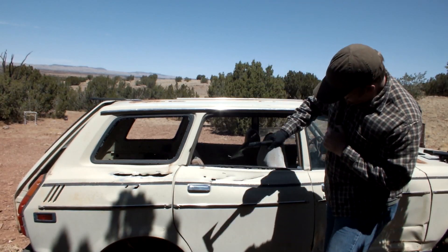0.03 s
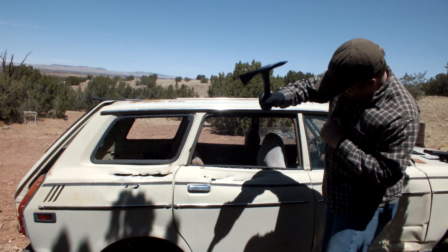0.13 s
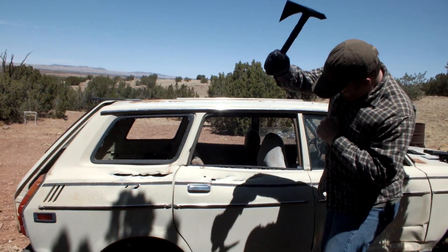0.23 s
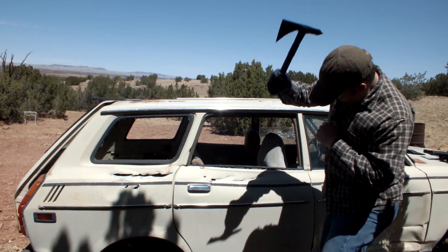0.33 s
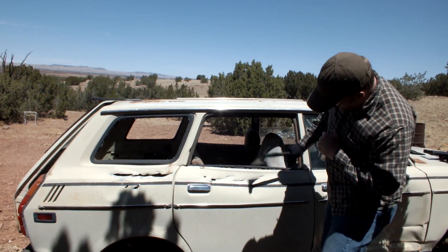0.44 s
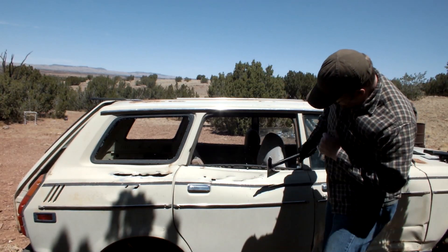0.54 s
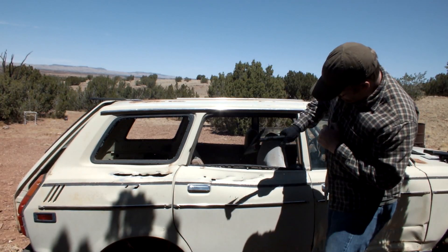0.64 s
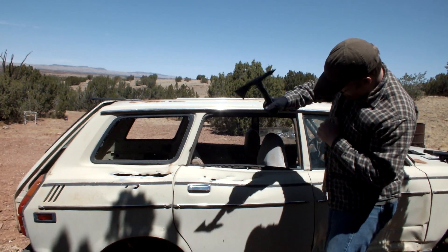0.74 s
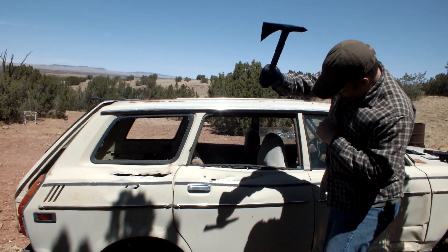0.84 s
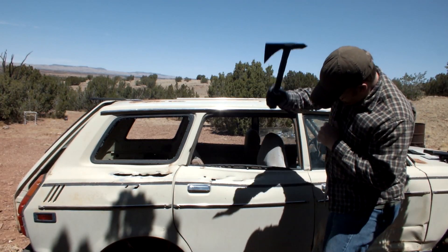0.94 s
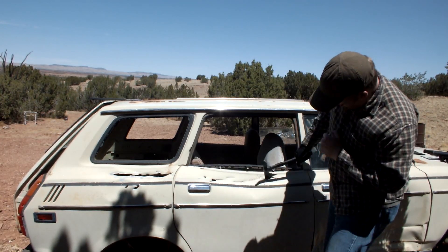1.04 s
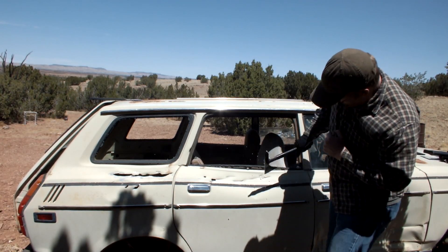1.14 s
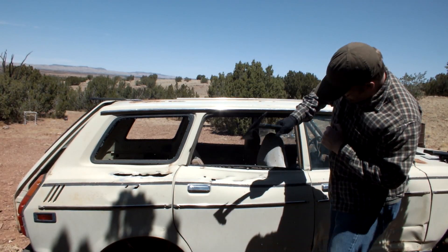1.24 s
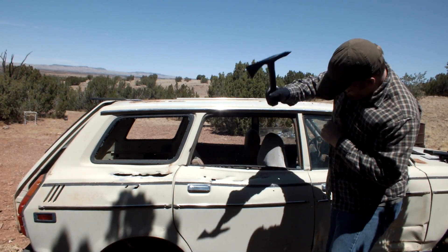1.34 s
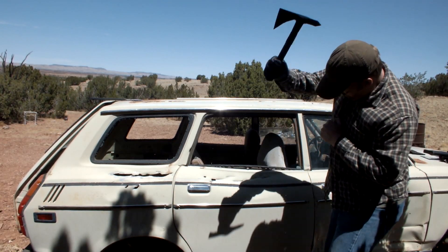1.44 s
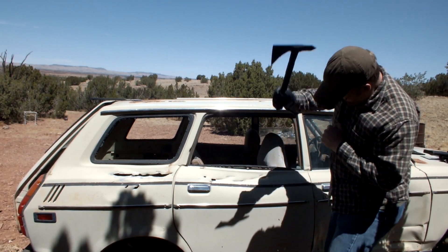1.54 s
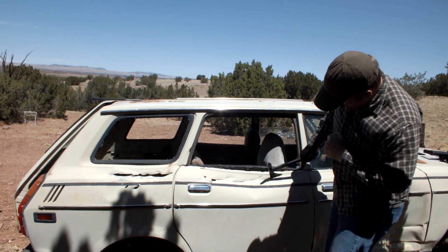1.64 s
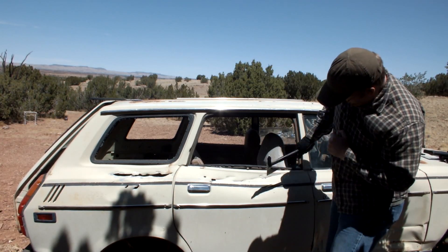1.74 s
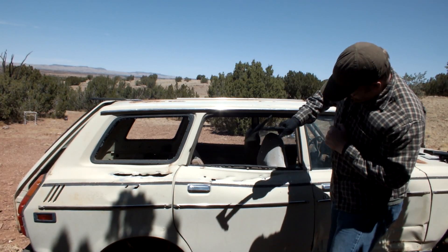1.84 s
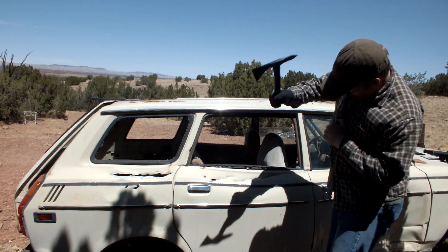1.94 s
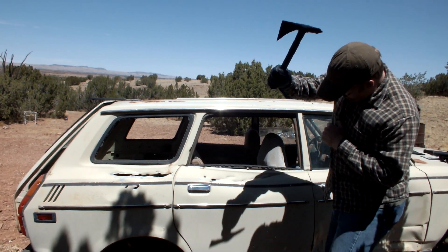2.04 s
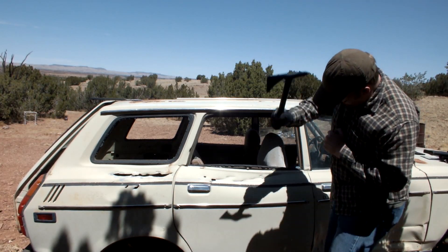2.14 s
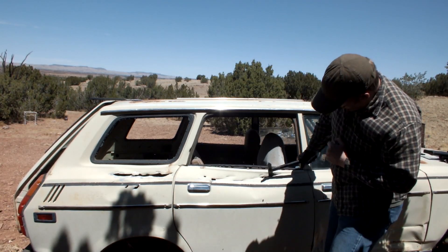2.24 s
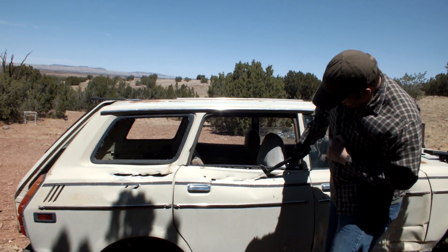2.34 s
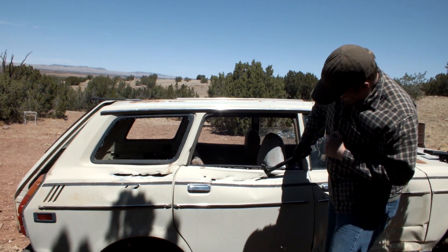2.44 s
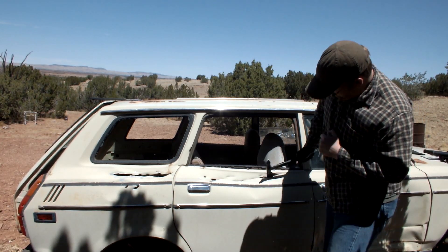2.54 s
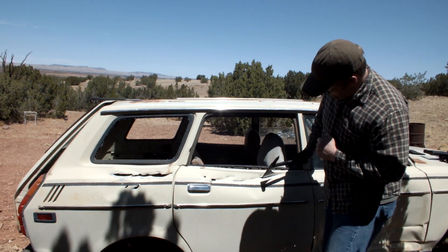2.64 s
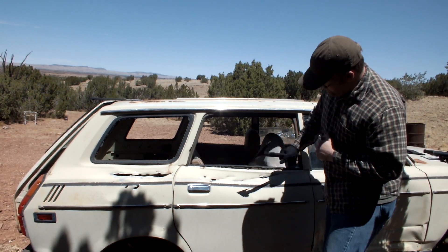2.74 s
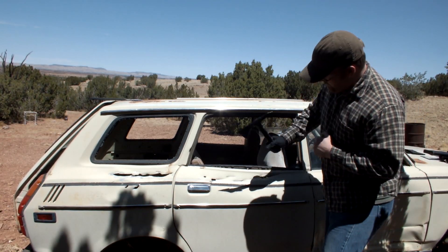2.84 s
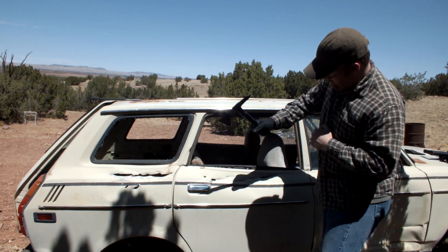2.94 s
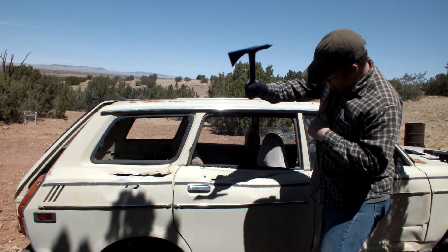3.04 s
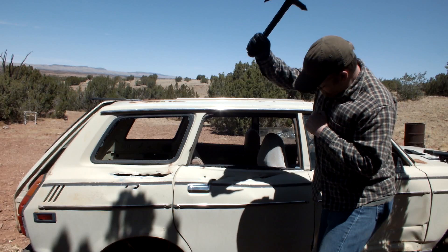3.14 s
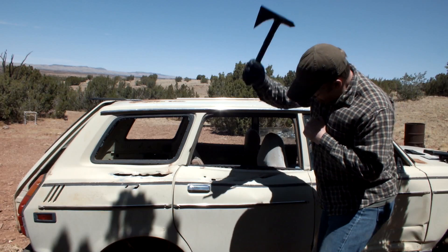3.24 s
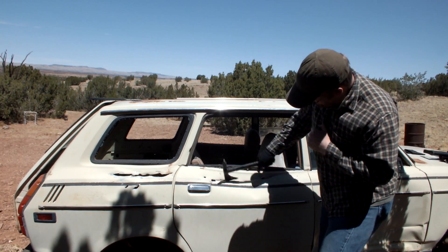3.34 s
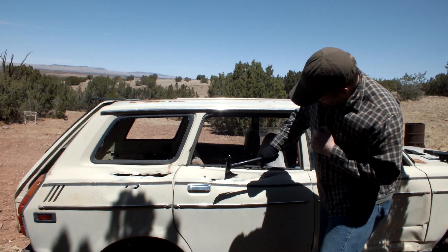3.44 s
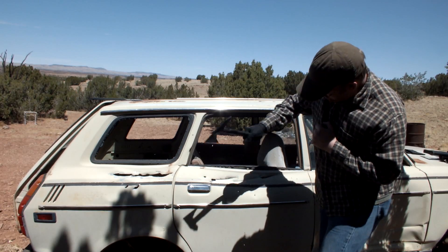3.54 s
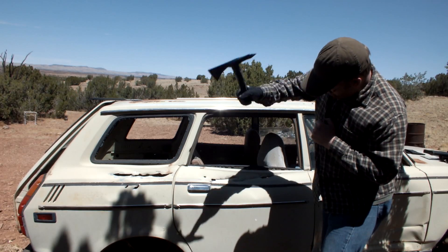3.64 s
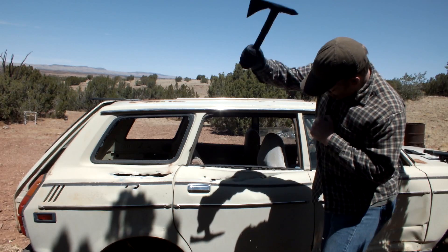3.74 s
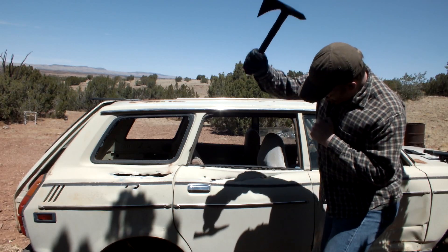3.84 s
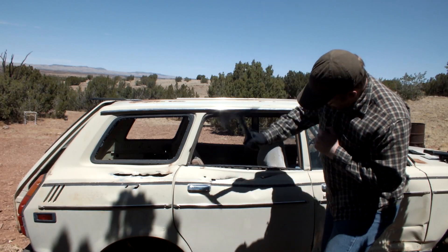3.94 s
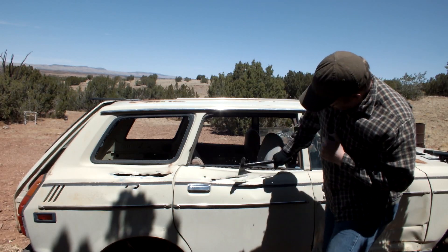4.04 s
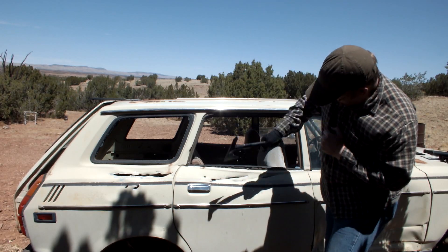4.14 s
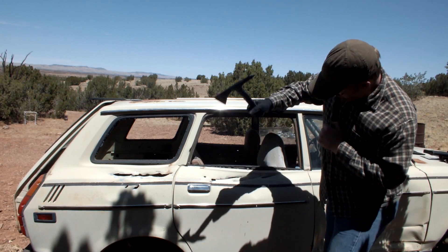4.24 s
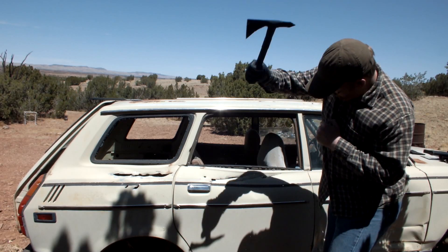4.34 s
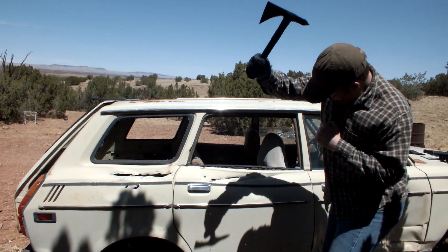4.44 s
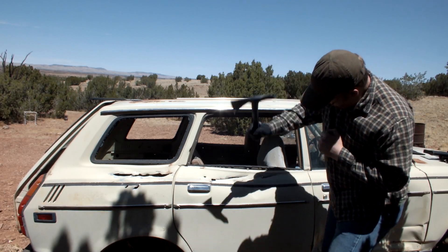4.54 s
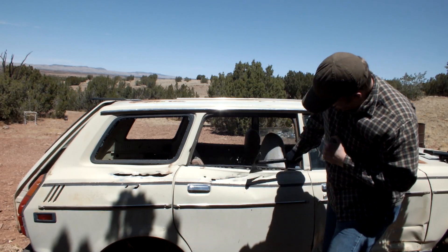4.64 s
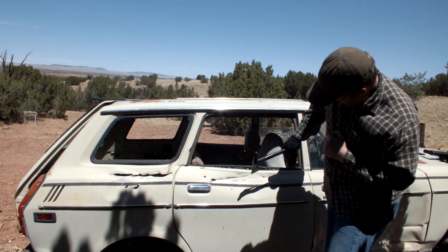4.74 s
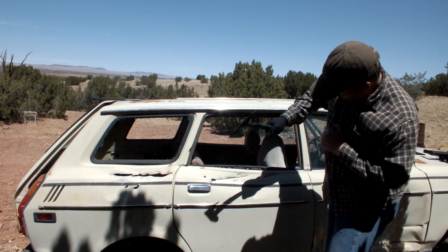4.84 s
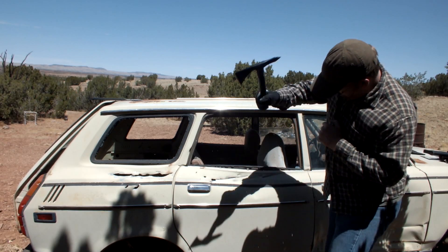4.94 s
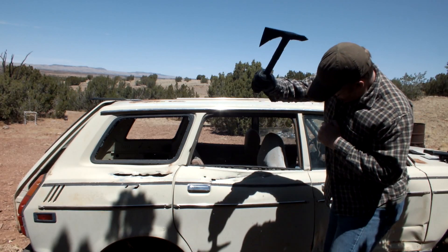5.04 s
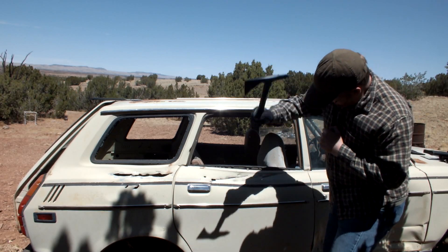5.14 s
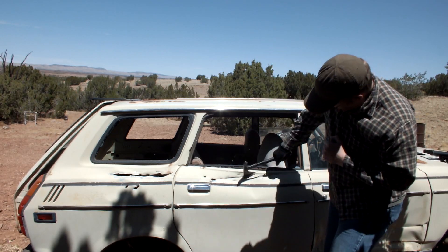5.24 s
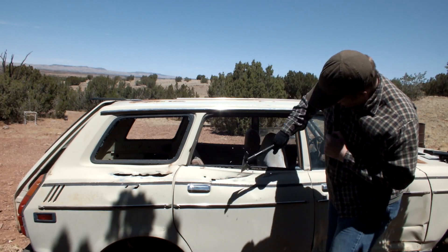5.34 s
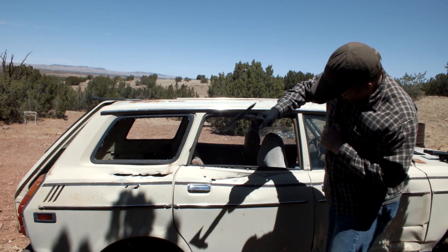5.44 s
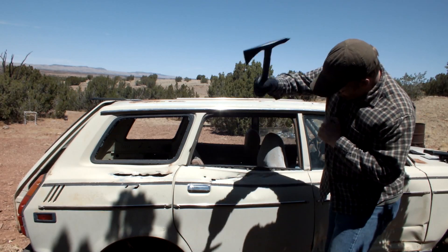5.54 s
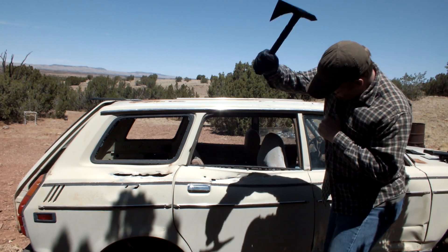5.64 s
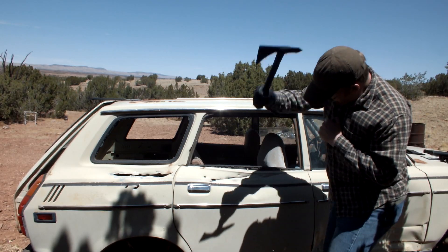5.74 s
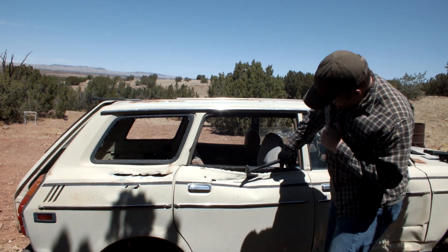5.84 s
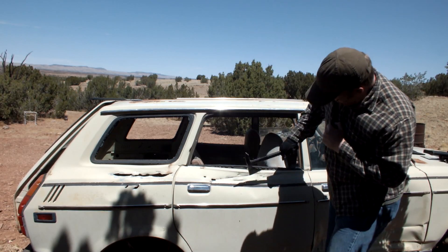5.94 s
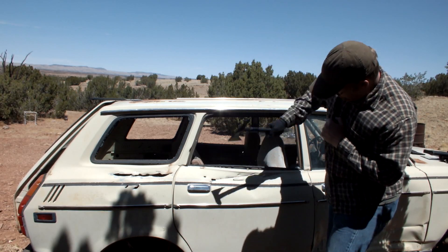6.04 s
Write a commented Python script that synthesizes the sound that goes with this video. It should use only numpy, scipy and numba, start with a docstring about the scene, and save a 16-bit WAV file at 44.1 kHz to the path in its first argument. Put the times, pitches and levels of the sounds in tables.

```python
"""Open desert, a derelict car: a hand axe chops the last glass out of a side window, ten blows.
Each blow cracks the glass (filtered noise and clicks), booms the hollow steel door (decaying modes and
noise bands) and rattles the crumbs inside it (clicks ringing glass modes). Between blows the blade
crunches out of the channel and chips, splinters and crumbs fall; a few single tones ring, over faint air.
A limiter flattens the booms."""
import sys
import numpy as np
from scipy import signal
from scipy.fft import rfft, irfft, next_fast_len
from scipy.io import wavfile
from numba import njit

SR = 44100
rng = np.random.default_rng(int(sys.argv[2]) if len(sys.argv) > 2 else 0)


def master_out(mix):
    """Clip the mix to full scale and print it as 16-bit PCM to the path in sys.argv[1]."""
    frames = np.transpose(np.atleast_2d(mix))
    ceiling = np.clip(frames, -1, 1)
    pcm = np.round(ceiling * 32767).astype(np.int16)
    wavfile.write(sys.argv[1], SR, pcm)


N = 268127


def undb(db):
    """Decibels to gain."""
    return 10 ** (np.asarray(db) / 20)


def at(points, hz):
    """Interpolate (Hz, value) points on a log-frequency axis."""
    point_hz, value = np.transpose(points)
    return np.interp(np.log(np.maximum(hz, 1)), np.log(point_hz), value)


def noise(count):
    """Two independent noises: row 0 is common to both channels (mid), row 1 their difference (side)."""
    return rng.standard_normal((2, count))


def colour(x, points, extra=None):
    """Minimum-phase filter: unit power for white input, then tilted by extra (Hz, dB) points."""
    count = x.shape[-1]
    size = 2 * next_fast_len(count)
    hz = np.arange(size // 2 + 1) * SR / size
    gain = undb(at(points, hz))
    gain = gain / np.sqrt(np.mean(gain ** 2))
    if extra is not None:
        gain = gain * undb(at(extra, hz))
    # folding the cepstrum onto positive time makes the response causal
    cepstrum = irfft(np.log(gain))[:size // 2]
    response = np.exp(rfft(2 * cepstrum, size) - cepstrum[0])
    return irfft(rfft(x, size) * response)[..., :count]


def fade(t, t60):
    """Exponential decay, 60 dB down after t60 seconds."""
    return np.exp(-np.log(1000) * t / np.maximum(t60, 1e-4))


def clicks(count, rate_hz, spread_db):
    """Random clicks of very unequal size, unit power."""
    hit = rng.random(count) < rate_hz / SR
    size = hit * undb(spread_db * np.clip(rng.standard_normal(count), -2, 2))
    return noise(count) * size / np.sqrt(np.mean(size ** 2) + 1e-12)


def cabin(x, wet_db, t60):
    """Direct sound plus diffuse echoes of door and cabin: fresh noise following the decaying energy."""
    keep = fade(1 / SR, t60) ** 2
    energy = signal.lfilter([1 - keep], [1, -keep], x[0] ** 2 + 1e-18)
    return x + undb(wet_db) * noise(x.shape[1]) * np.sqrt(energy)


def add(out, start_s, x):
    """Mix x into out from start_s."""
    start = int(round(start_s * SR))
    a, b = max(start, 0), min(start + x.shape[1], N)
    if a < b:
        out[:, a:b] += x[:, a - start:b - start]


def modes(table, t, ring, build_cycles, scatter_db=-3.0, detune=0.0083):
    """Modes build up over some cycles and ring out; every blow lands elsewhere and weights them anew."""
    out = np.zeros((2, len(t)))
    draws = rng.standard_normal((len(table), 3))
    for (pitch_hz, level_db, t60), (shift, phase, weight) in zip(table, draws):
        wave = np.sin(2 * np.pi * (pitch_hz * (1 + detune * shift) * t + phase))
        build = 1 - np.exp(-t * pitch_hz / build_cycles)
        out[0] += undb(level_db + scatter_db * weight) * wave * fade(t, ring * t60) * build
    return out


def shard(x, t60, count=48, size=2400):
    """Ring of a piece of glass: its odd shape gives it scattered modes of its own."""
    t = np.arange(size) / SR
    place, phase, strength = rng.random((count, 3)).T[:, :, None]
    hz = 900 + 14000 * place ** 1.2
    ring = np.sum(strength * np.sin(2 * np.pi * (hz * t + phase)), axis=0) * fade(t, t60)
    unit_ring = ring[None] / np.sqrt(np.sum(ring ** 2))
    return signal.fftconvolve(x, unit_ring, axes=1)[:, :x.shape[1]]


# air spectrum: [pitch_hz, density_rel_db]
AIR_SPECTRUM = [(30, -10), (100, 9.5), (400, 6.5), (1100, -3), (1600, -12), (2150, 0), (3200, -37),
                (6500, -14), (13000, -21), (15000, -37)]


def air(level_db=-59):
    """Faint steady hiss of open country: filtered noise."""
    return undb(level_db) * colour(noise(N), AIR_SPECTRUM)


# blade drawn back, grinding along the glass in the channel: [start_s, length_s, peak_rel_db]
BLADE_DRAGS = [(0.287, 0.047, -41.5), (1.526, 0.025, -30), (1.605, 0.037, -33), (1.975, 0.13, -43),
               (2.69, .08, -49), (4.38, 0.2, -42.5), (4.901, 0.056, -38)]


def crumb_flow(fall_s=0.016, shed_db=-35, shed_t60=0.49, settle_db=-60, count=2000):
    """Crumb amplitude: each blow spills some, each chip sheds a few, the dragged blade grinds out more."""
    t = np.linspace(0, N / SR, count)
    power = np.full(count, undb(settle_db) ** 2)
    for start_s, *_, spill_db, spill_s in BLOWS_AND_BUMPS:
        age = np.maximum(t - start_s, 0)
        spill = undb(spill_db) * (1 - np.exp(-age / fall_s)) * np.exp(-(age / spill_s) ** 2)
        power += spill ** 2
    for start_s, level_db, *_ in GLASS_CHIPS:
        shed = undb(level_db + shed_db) * fade(abs(t - start_s), shed_t60)
        power += (t > start_s) * shed ** 2
    for start_s, length_s, level_db in BLADE_DRAGS:
        progress = np.clip((t - start_s) / length_s, 0, 1)
        power += undb(level_db) ** 2 * abs(np.sin(np.pi * progress))
    return np.interp(np.arange(N) / SR, t, np.sqrt(power))


# falling crumb spectrum: [pitch_hz, density_rel_db]
CRUMB_SPECTRUM = [(50, -84), (200, 0), (600, 1), (1500, 4.5), (3500, 3), (5200, -5), (7500, -9),
                  (10000, -15.5), (15000, -25.5)]


def trickle(level_db=-3, glass_db=-7, size=2205):
    """Fine crumbs skitter down door and seat: clicks ring a new set of glass modes every 50 ms."""
    crumbs = clicks(N, 900, 4.36) * crumb_flow() * undb(level_db)
    out = cabin(crumbs, 0, 0.04)
    for start in range(0, N, size):
        handful = np.pad(crumbs[:, start:start + size], [(0, 0), (0, size)])
        add(out, start / SR, undb(glass_db) * shard(handful, 0.06, count=24))
    return colour(out, CRUMB_SPECTRUM)


def splinters(level_db=-32, spread_db=-2.5, treble_db=-14, earliest_s=0.11, latest_s=0.75,
              count=4, size=3000):
    """Splinters thrown up by each blow tick down at random moments, louder after a harder crack."""
    out, t = np.zeros((2, N)), np.arange(size) / SR
    tone = [(4300, 0), (7500, treble_db)]
    for start_s, _, crack_db, *_ in BLOWS_AND_BUMPS:
        flights_s = rng.uniform(earliest_s, latest_s, count)
        offsets_db = spread_db * rng.standard_normal(count)
        for flight_s, offset_db in zip(flights_s, offsets_db):
            tick = noise(size) * fade(t, 0.006)
            sound = cabin(tick, 0, 0.017) + shard(tick, 0.023, count=16)
            gain = undb(level_db + crack_db + offset_db)
            add(out, start_s + flight_s, gain * colour(sound, CHIP_SPECTRUM, tone))
    return out


# brief single tones: [start_s, pitch_hz, level_db, t60_s]
SINGLE_TONES = [(0.238, 6800, -42, 0.049), (0.272, 14850, -42, .08), (0.541, 7585, -39, 0.42),
                (0.714, 3370, -15, 0.029), (1.43, 2320, -29, 0.066), (1.430, 2030, -26.5, 0.045),
                (1.429, 2690, -29, 0.034), (2.025, 3400, -26, .05), (2.537, 6900, -41.5, 0.13),
                (2.588, 410, -18.5, .13), (2.620, 14900, -42, 0.058), (2.696, 7000, -39, 0.12),
                (2.715, 3310, -27, 0.047), (2.743, 2905, -28, 0.12), (2.746, 1880, -29, 0.087),
                (5.310, 7640, -60, 0.83), (5.931, 7620, -30, 0.28)]


def pings(size=20000):
    """A door panel, the blade or a loose shard rings on a single mode: a decaying sine."""
    out, t = np.zeros((2, N)), np.arange(size) / SR
    for start_s, pitch_hz, level_db, t60 in SINGLE_TONES:
        wave = np.sin(2 * np.pi * (pitch_hz * t + rng.random((2, 1))))
        add(out, start_s, undb(level_db) * fade(t, t60) * wave)
    return out


# chip spectrum: [pitch_hz, density_rel_db]
CHIP_SPECTRUM = [(60, -11), (250, -0.5), (500, 7.5), (900, 4), (1600, 6), (2400, 5), (3700, 3.5),
                 (5000, 1.5), (7500, 12), (9500, 4.5), (15000, -3.5)]
# larger pieces snapping in the channel or landing on the door:
# [start_s, level_rel_db, treble_db, crunch_decay_s]
GLASS_CHIPS = [(0.049, -15, -21, 0.011), (0.256, -22, -14.5, 0.013), (0.314, -25, -8.5, 0.0096),
               (0.398, -31, -16, 0.011), (0.532, 1.5, -37, 0.0041), (0.7175, -6, -27.5, 0.0092),
               (0.83, -10, -18, 0.0077), (0.964, -6, -21.5, .017), (1.07, -11, -16.5, 0.012),
               (1.281, -19, -48, 0.0067), (1.431, -28.5, -42, .01), (1.537, -14, -24.5, 0.031),
               (1.596, -20, -10, 0.0087), (1.613, -10, -24.5, 0.013), (1.638, -15.5, -28.5, 0.027),
               (1.886, -11, -9, 0.0061), (1.943, -12.5, -19.5, 0.0033), (2.081, -16.5, -7, 0.0039),
               (2.124, -13.5, -20, .008), (2.166, -27.5, -6, 0.0058), (2.181, -20.5, -13.5, 0.0087),
               (2.235, -10.5, -18.5, .008), (2.437, -21.5, -29, 0.007), (2.47, -20.5, -30, 0.0086),
               (2.591, -17.5, -73.5, 0.016), (2.657, -20.5, -13, 0.0047), (2.717, -16.5, -8, 0.0078),
               (2.744, -15, -12, 0.0097), (2.968, -20, -9, .006), (3.015, -22.5, -15.5, 0.0074),
               (3.29, -32, -38, 0.007), (3.653, -16.5, -18, 0.073), (3.721, -10, -14.5, 0.017),
               (3.7818, -9.5, -12, 0.016), (3.835, -13, -13.5, 0.0087), (3.868, -18, -15, 0.013),
               (3.894, -15.5, -13, 0.028), (3.921, -25, -1.5, 0.0066), (3.952, -22, -20, 0.011),
               (4.011, -24, -7, .006), (4.171, -14, -36, 0.0068), (4.268, -20.5, -26, .007),
               (4.302, -19.5, -14.5, 0.019), (4.36, -24, -7.5, 0.0094), (4.416, -29, -4.5, 0.034),
               (4.488, -14, -13, 0.011), (4.518, -25.5, -11, 0.0052), (4.618, -17, -13.5, 0.015),
               (4.946, -8, -18.5, 0.011), (4.955, -14, -47, 0.022), (5.078, -29.5, -22, 0.016),
               (5.129, -23.5, -19, 0.017), (5.155, -7.5, -21, 0.011), (5.415, -9, -47, 0.0041),
               (5.477, -18.5, -23, 0.0044), (5.652, -26, -13, 0.013), (5.696, -21, -22, 0.022),
               (5.803, -30.5, -19.5, 0.039)]


def chips(level_db=-1, click_db=12, snap_t60=0.0036, crunch_db=-9, glass_db=-6,
          knock_db=-15, knock_slope=0.37, size=6000):
    """A snap and a run of small fractures ring the shard and echo in the door; dull pieces knock more."""
    out, t = np.zeros((2, N)), np.arange(size) / SR
    for start_s, chip_db, treble_db, crunch_s in GLASS_CHIPS:
        snap = noise(size) * fade(t, snap_t60)
        crunch = undb(crunch_db) * clicks(size, 1500, 8) * np.exp(-t / max(crunch_s, .001))
        fracture = snap + crunch
        fracture[0, 0] += undb(click_db)
        sound = cabin(fracture, 0, 0.06) + undb(glass_db) * shard(fracture, 0.06, count=28)
        tone = [(450, knock_db - knock_slope * treble_db), (1000, 0), (4300, 0), (7500, treble_db)]
        add(out, start_s, undb(chip_db + level_db) * colour(sound, CHIP_SPECTRUM, tone))
    return out


# door panels and cavity: [pitch_hz, level_rel_db, t60_s at ring 1]
PANEL_MODES = [(164.7, -6.5, 0.72), (196, -28, 0.26), (232.4, -1, 0.44), (267.2, -7.5, 0.73),
               (308.1, -0.5, 0.3), (340, -37, 1), (360, -1.5, 0.23), (411, -6.5, 0.56), (534, -21.5, 0.49),
               (750, -10.5, 0.7), (947, -2.5, 0.24)]
# dense higher door modes: [pitch_hz, density_rel_db]
DOOR_SPECTRUM = [(25, -31), (65, 9), (105, 1.5), (138, 0), (165, -0.5), (200, -1.5), (260, 4), (420, 4),
                 (560, -0.5), (780, -6.5), (1150, -23.5), (3000, -24), (5500, -36.5), (14000, -43.5)]
# their decay: [pitch_hz, t60_s at ring 1]
DOOR_DECAY = [(60, 0.87), (170, 0.75), (350, 0.5), (800, 0.49), (2500, 0.62), (10000, 0.27)]


def door(t, tilt_db, ring, build_cycles=15, modes_db=-7, grip_s=0.51):
    """The blow spreads through the steel: each band builds up over some cycles, so the lows are slowest."""
    tilt = [(50, -3 * tilt_db), (12800, 5 * tilt_db)]  # tilt_db per octave about 400 Hz
    spectrum = rfft(colour(noise(len(t)), DOOR_SPECTRUM, tilt))
    hz = np.arange(spectrum.shape[1]) * SR / len(t)
    octave = np.log2(np.maximum(hz, 25) / 25)
    out = undb(modes_db) * modes(PANEL_MODES, t, ring, build_cycles)
    for k in range(11):
        band_hz = 25 * 2 ** k
        band = irfft(spectrum * np.maximum(1 - abs(octave - k), 0))
        build = 1 - np.exp(-t * band_hz / build_cycles)
        out += band * fade(t, ring * at(DOOR_DECAY, band_hz)) * build
    # friction at the seals grips harder as the motion dies
    return out * np.exp(-(t / grip_s) ** 2)


# steel edge through glass: [pitch_hz, density_rel_db]
CRACK_SPECTRUM = [(40, -41), (150, 2.5), (400, 7), (1200, 2), (2200, 0.5), (3800, -3.5), (5200, -11),
                  (7800, -13.5), (10000, -23), (15000, -39)]
# crumbs shaken inside the door: [pitch_hz, density_rel_db]
RATTLE_SPECTRUM = [(200, -11), (700, 3.5), (1500, 4), (2600, -7), (3900, -10.5), (5300, -19.5), (7800, -21),
                   (10000, -31), (15000, -47)]
# whole door swinging against its latch: [pitch_hz, level_rel_db, t60_s at ring 1]
LATCH_MODES = [(40, -22, 0.56), (56.3, -35, 1), (66.4, -12.5, 0.79), (80.4, -2.5, 0.097), (98.3, -37, 0.97)]
# ten axe blows, two light bumps of the head on the door:
# [start_s, door_rel_db, crack_rel_db, rattle_rel_db, door_tilt_db_per_octave, ring_factor,
#  swing_rel_db, spill_rel_db, spill_decay_s]
BLOWS_AND_BUMPS = [(-0.07, -9, -3, -20.5, 1, 0.85, -23, -50, 0.54),
                   (0.5135, -5, -1, -15, 0.96, 0.79, -13, -56, 0.17),
                   (1.0970, -7, -4.5, -18, 0, 0.79, -15, -45, 0.21),
                   (1.6984, -8.5, 0, -22, 0, 0.8, -13.5, -52, 0.64),
                   (2.2759, -10, -3.5, -18.5, 1, 0.91, -12.5, -50, 0.71),
                   (2.576, -13.5, -28, -38, 0, 0.21, -50, -35.5, 0.041),
                   (3.4022, -9, 1.5, -18, 2.5, 1, -17, -34, 0.47),
                   (4.0433, -6.5, -2, -19, 1, 0.86, -26.5, -32.5, 0.2),
                   (4.6574, -9, -2, -18.5, 0.5, 0.92, -15.5, -26, 0.12),
                   (5.286, -11, -1.5, -17, 1.1, 0.91, -20, -32, 0.12),
                   (5.4126, 3, -27.5, -39, -2, 0.084, -29, -60, 0.082),
                   (5.902, -7.5, -2, -17, 1.25, 0.91, -23, -33.5, 0.19)]


def blows(edge_db=14, snap_t60=0.018, crush_db=-9, crush_t60=0.059, rattle_t60=0.59, glass_db=-7,
          swing_delay_s=.062, rebound_db=-7, crumbs_db=-9.0, bounce_db=5, bounce_hz=66, size=30000):
    """A snap, a short crush of glass, the door's boom with crumbs chattering in it, and its late swing."""
    out, t = np.zeros((2, N)), np.arange(size) / SR
    for start_s, door_db, crack_db, rattle_db, tilt_db, ring, swing_db, *_ in BLOWS_AND_BUMPS:
        snap = noise(size) * fade(t, snap_t60)
        snap[0, 0] += undb(edge_db)  # the edge meets the glass
        fractures = clicks(size, 830, 4.6) * fade(t, crush_t60)
        crush = undb(crush_db) * cabin(fractures, -0.075, 0.064)
        crack = undb(crack_db) * colour(snap + crush, CRACK_SPECTRUM)
        # the crumbs hop with the swinging door
        bounce = undb(bounce_db * np.sin(2 * np.pi * (bounce_hz * t + rng.random())))
        crumbs = clicks(size, 700, 5.0) * bounce * fade(t, rattle_t60) * undb(rattle_db + crumbs_db)
        rattle = cabin(crumbs, 4.1, 0.071) + undb(glass_db) * shard(crumbs, 0.082, count=70)
        boom = undb(door_db) * door(t, tilt_db, ring)
        add(out, start_s, crack + colour(rattle, RATTLE_SPECTRUM) + boom)
        # the door swings back against its latch and shakes the panels a second time
        swing = undb(swing_db) * modes(LATCH_MODES, t, 0.95, 0.72, scatter_db=4.5)
        panels = modes(PANEL_MODES[:8], t, .65 * ring, 7, scatter_db=3.5)
        rebound = undb(door_db + rebound_db) * panels
        add(out, start_s + swing_delay_s, swing + rebound)
    return out


def ports(x, right_db, wide_hz=5500):
    """Two microphones hear the bass alike and the treble differently; right up, left down by right_db."""
    high_pass = signal.butter(1, wide_hz, "high", fs=SR, output="sos")
    mid, side = x[0], signal.sosfilt(high_pass, x[1])
    return np.array([mid + side, mid - side]) * undb([[-right_db], [right_db]])


def scene():
    """Blows and air a little to the right; falling glass and single tones further right."""
    glass = chips() + trickle() + splinters() + pings()
    return ports(blows() + air(), right_db=1.6) + ports(glass, right_db=2.5, wide_hz=6000)


@njit
def follow(x, attack, release):
    """Level detector: rises fast, sinks slowly."""
    level, e = np.empty(len(x)), x[:400].max()
    for i in range(len(x)):
        e += (x[i] - e) * (attack if x[i] > e else release)
        level[i] = e
    return level


def record(dry, threshold_db=-10.0, attack_s=0.0025, release_s=0.08, top_hz=15300):
    """Limiter passes the first milliseconds and holds the boom level; peaks saturate, top is cut."""
    level = follow(np.abs(dry).max(axis=0), 1 / (attack_s * SR), 1 / (release_s * SR))
    held = dry / np.maximum(level / undb(threshold_db), 1)
    low_pass = signal.ellip(8, .2, 70, top_hz, fs=SR, output="sos")
    return signal.sosfilt(low_pass, np.tanh(held))


dry = scene()
out = record(dry)
master_out(out)
```